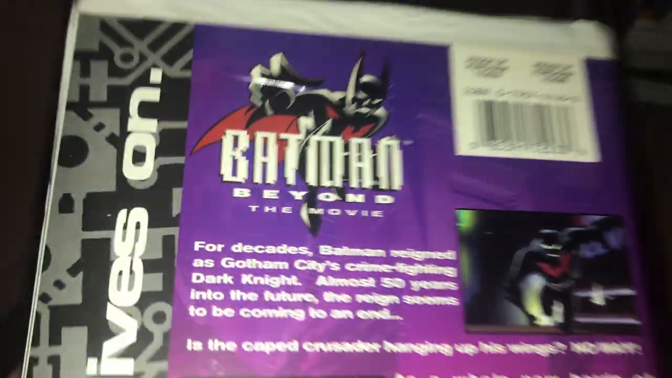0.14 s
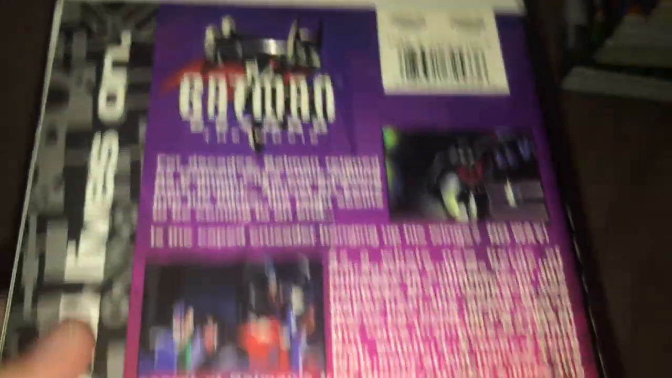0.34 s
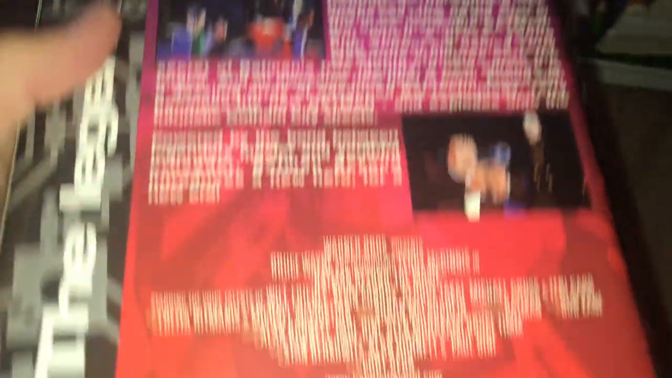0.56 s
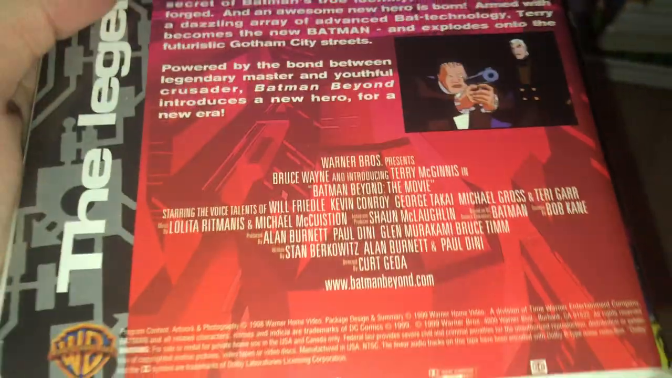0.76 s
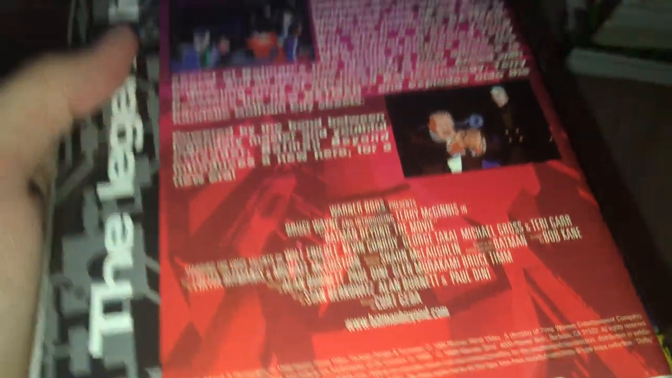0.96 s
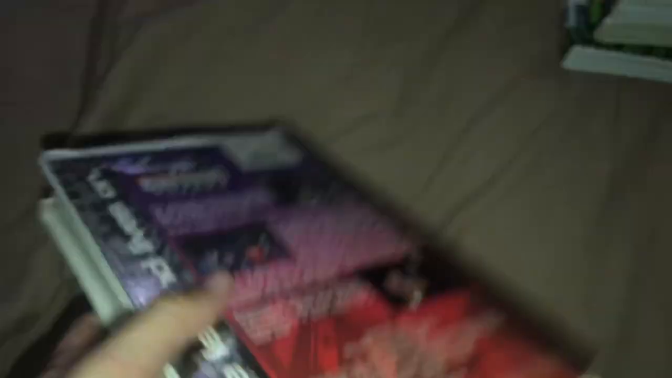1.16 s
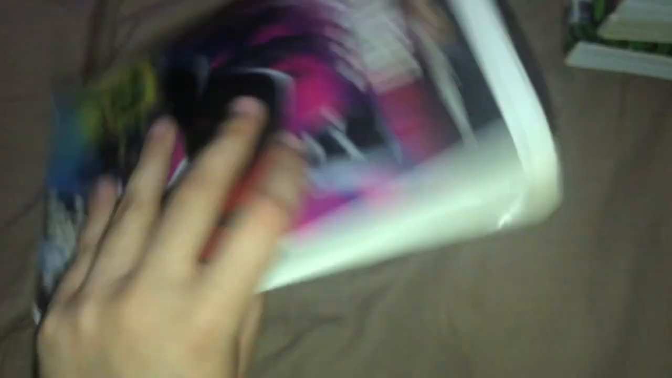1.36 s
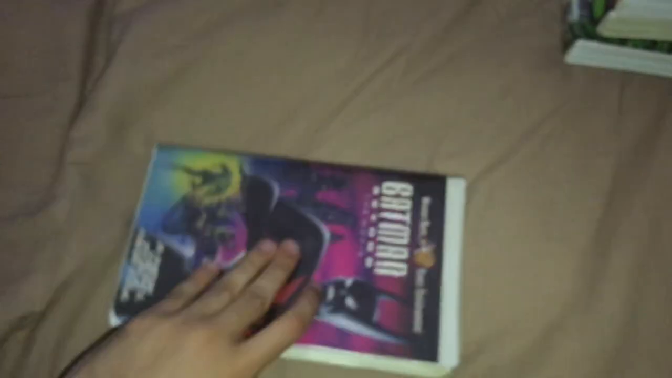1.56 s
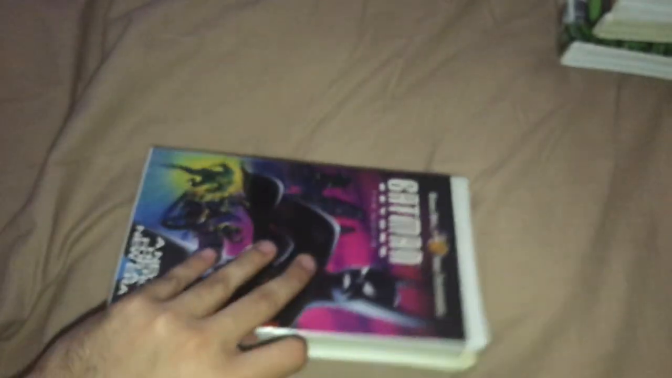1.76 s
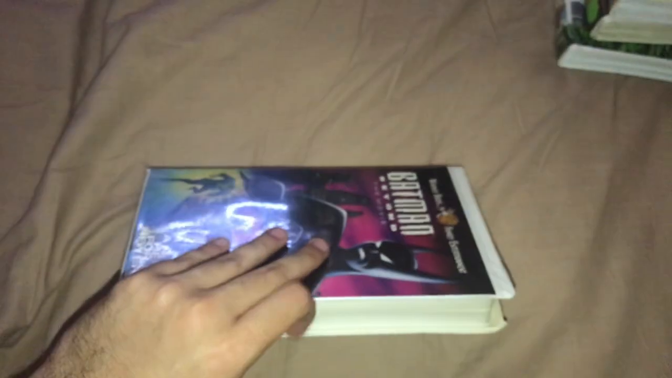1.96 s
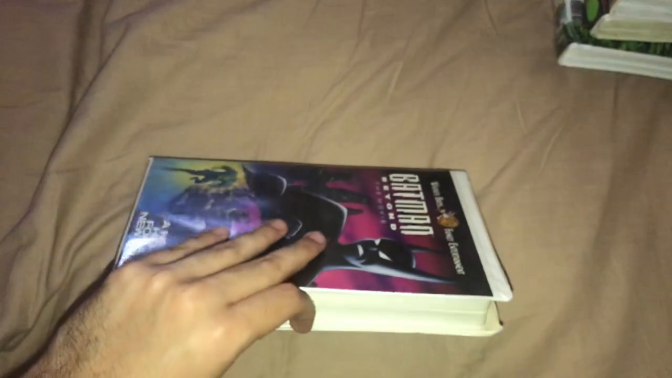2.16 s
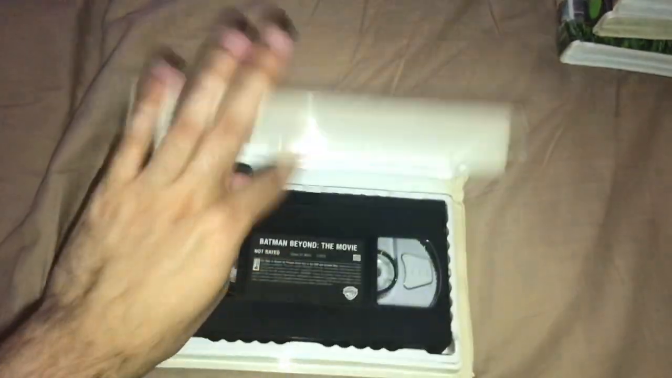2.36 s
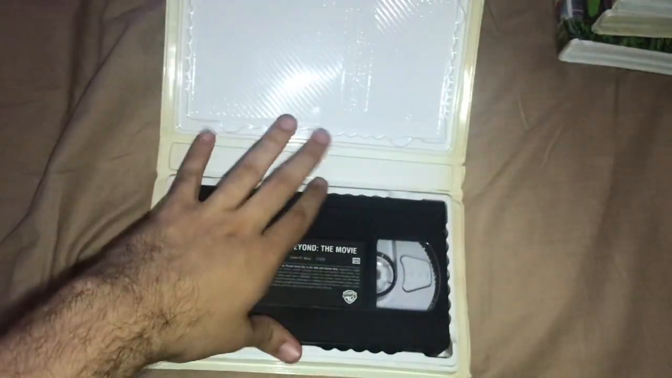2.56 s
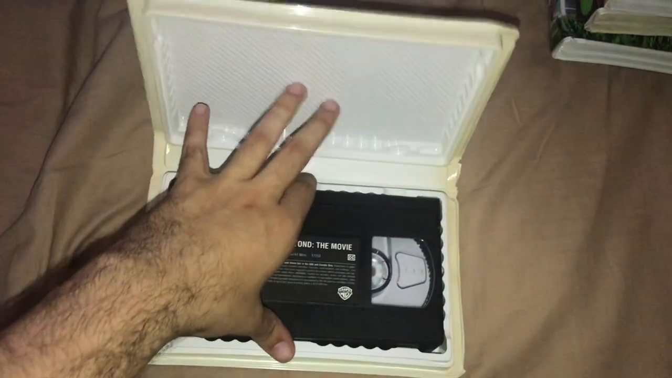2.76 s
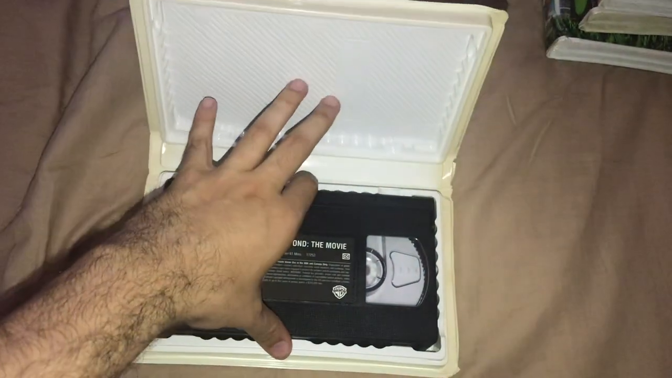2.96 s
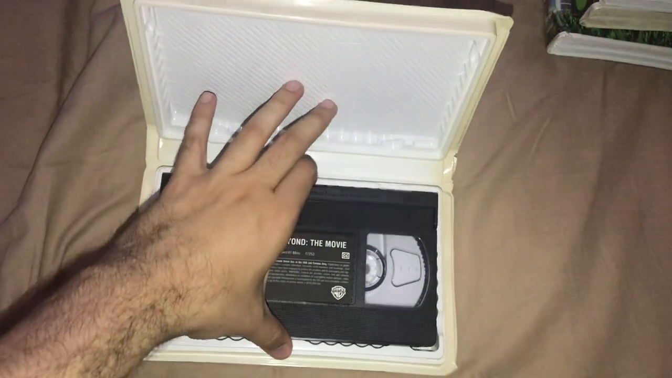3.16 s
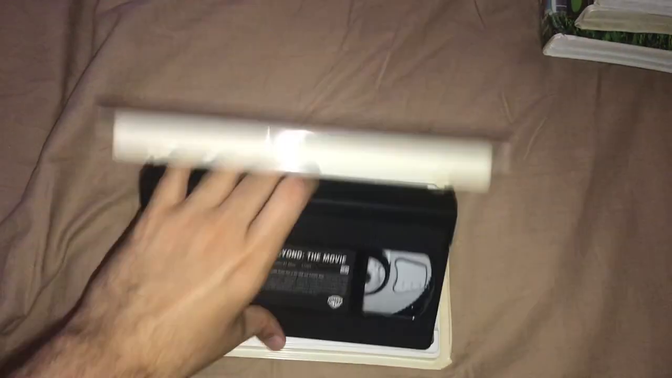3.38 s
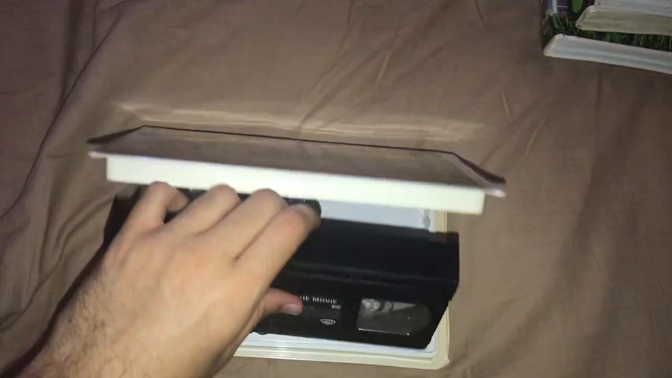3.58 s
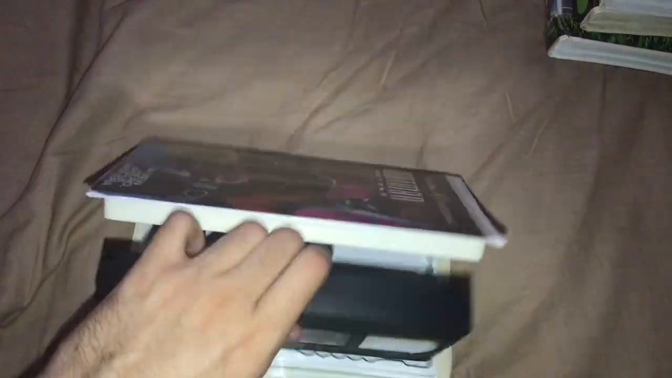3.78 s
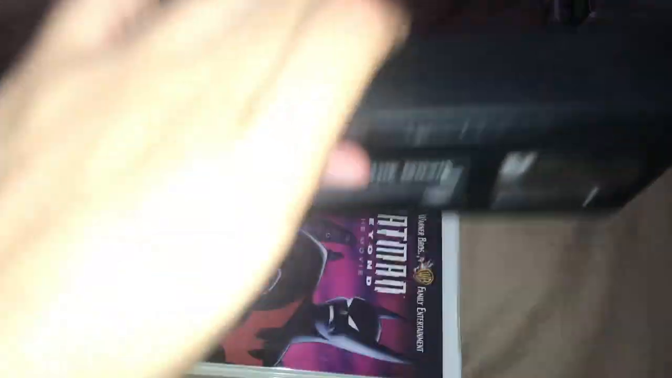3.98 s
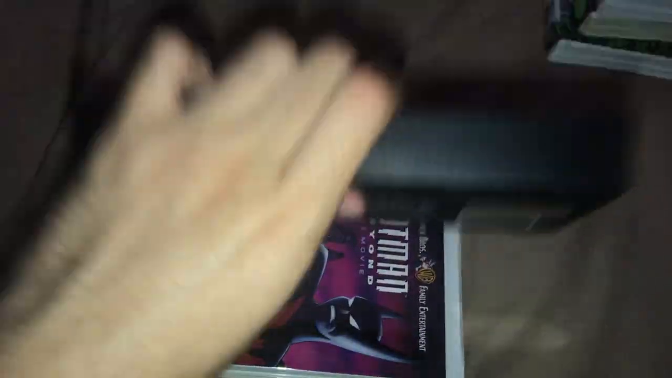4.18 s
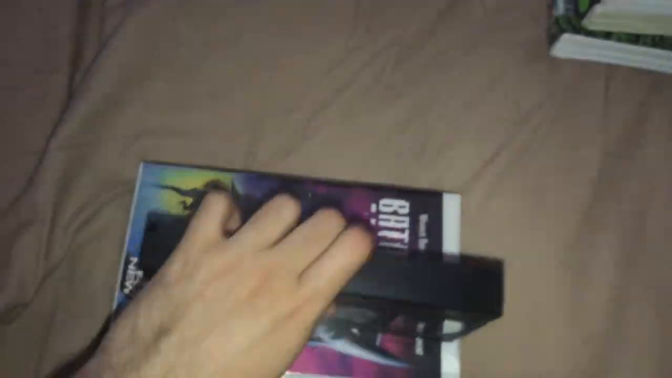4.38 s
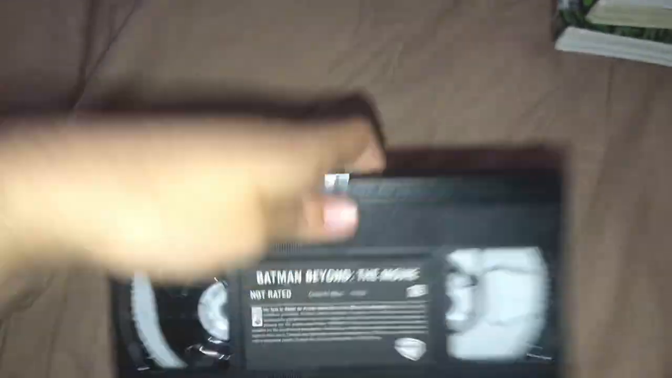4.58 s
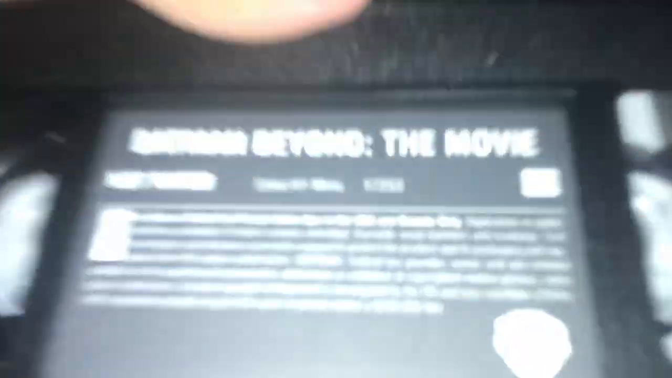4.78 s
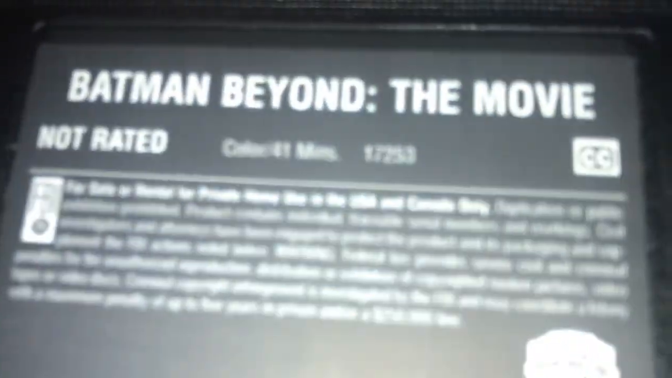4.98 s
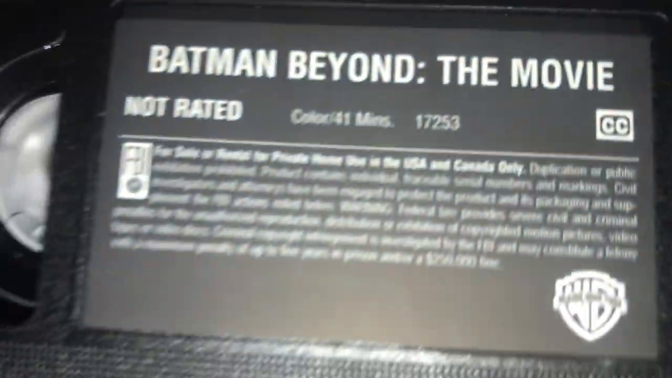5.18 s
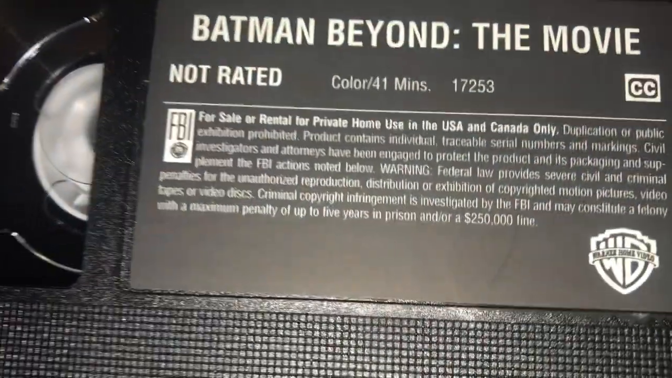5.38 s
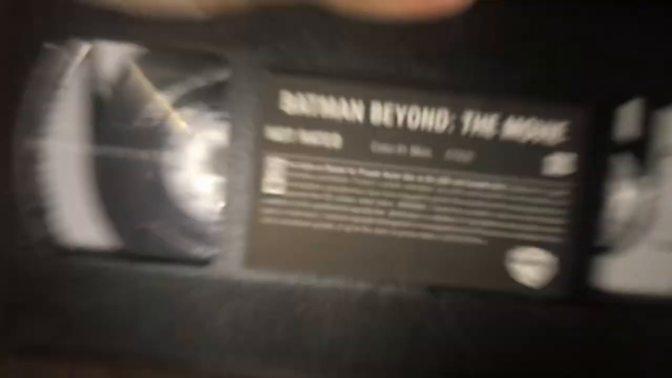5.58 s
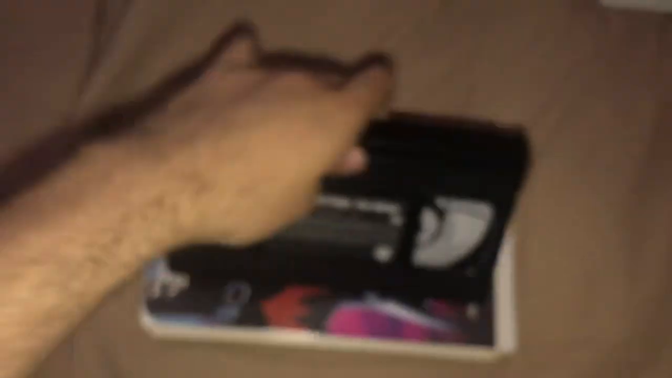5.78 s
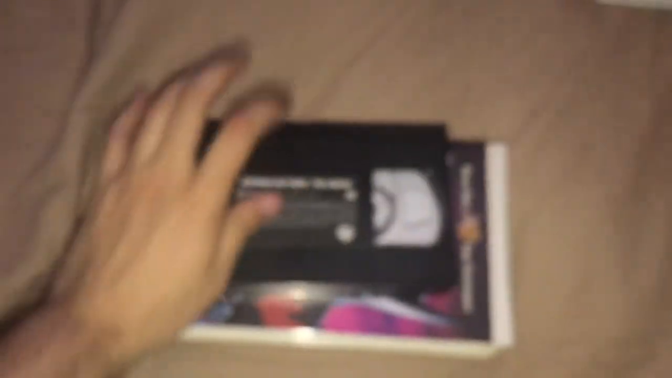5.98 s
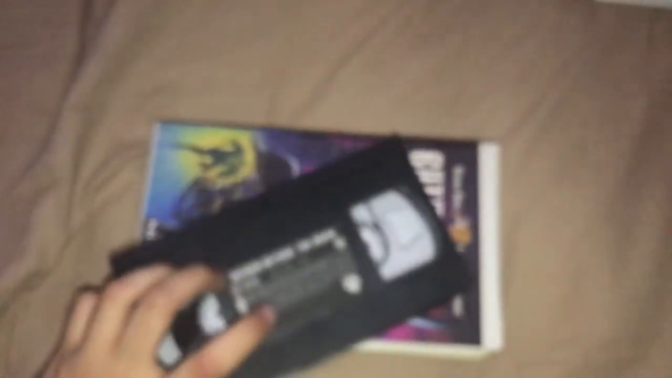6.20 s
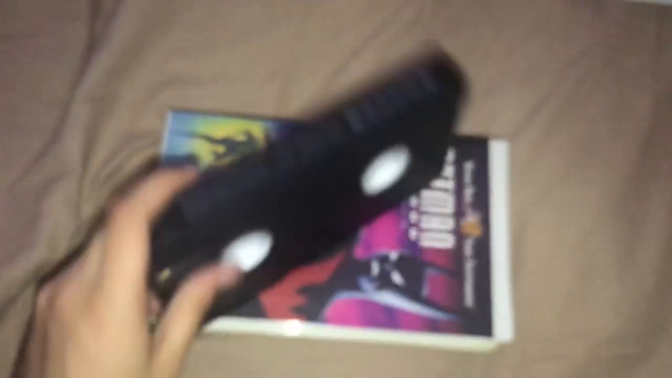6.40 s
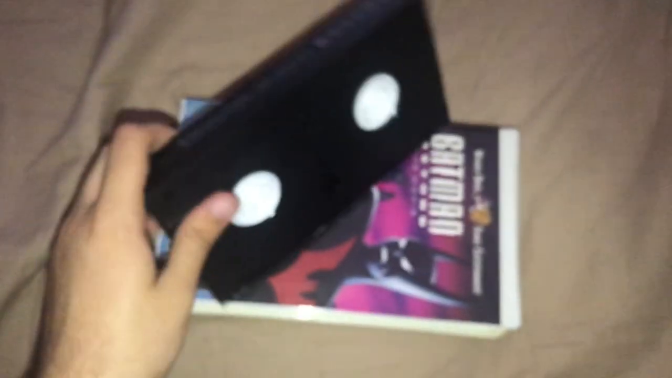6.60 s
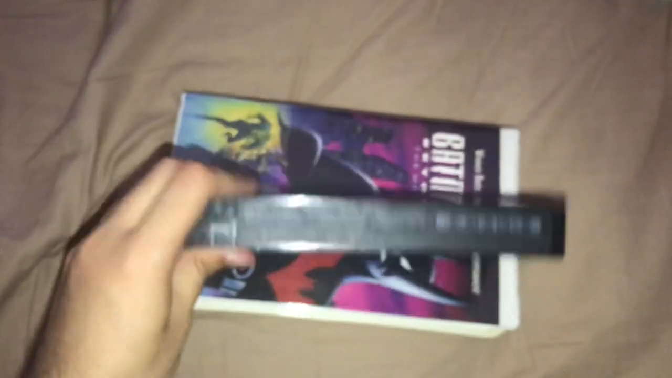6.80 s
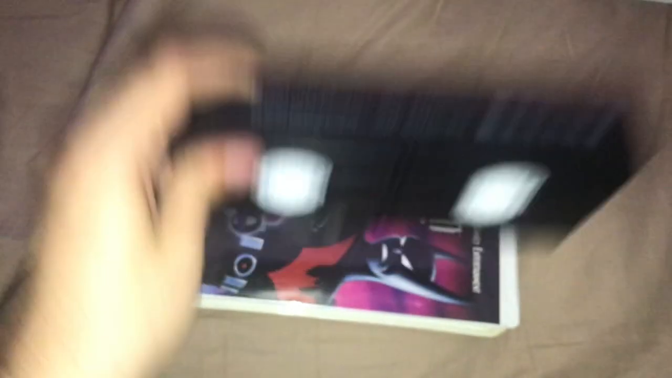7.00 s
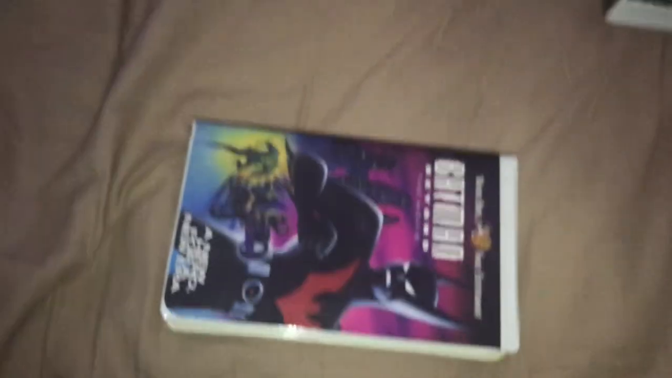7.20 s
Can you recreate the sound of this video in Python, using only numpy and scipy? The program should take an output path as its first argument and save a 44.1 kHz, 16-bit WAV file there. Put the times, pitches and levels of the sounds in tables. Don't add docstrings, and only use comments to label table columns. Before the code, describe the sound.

Close handling of a plastic tape case on a bed: soft touches, sharp clicks, hollow clacks, a heavy drop, then loose cassette rattle.

```python
import sys
import numpy as np
from scipy import signal
from scipy.fft import rfft, irfft
from scipy.io import wavfile
from scipy.ndimage import uniform_filter1d

SR = 44100
rng = np.random.default_rng(int(sys.argv[2]) if len(sys.argv) > 2 else 0)


def amplitude_ratio(level_db):
    exponent = np.asarray(level_db, float) / 20
    return 10 ** exponent


def digitize_waveform(pressure):
    field = np.atleast_2d(pressure).T
    bounded = np.clip(field, -1, 1)
    quanta = np.round(bounded * 32767).astype(np.int16)
    wavfile.write(sys.argv[1], SR, quanta)


N = 319725
RING = 2048

# pitch in Hz, level in dB, T60 in s.
BOX = [(356.6, 2.5, 0.04), (408, -6, 0.045), (492.6, -2, 0.039), (600, 1, 0.053), (713.5, -0.5, 0.049),
       (859, -11, 0.06)]
# frequency in Hz, level in dB.
CRACK = [(3000, -1), (4800, -2), (6000, -2), (8000, -7.5), (9300, -3), (10500, -11), (12500, -7.5),
         (15000, -13.5), (16900, -22)]
# start in s, pitch in Hz.
HOLLOW = [(0, 834), (0.03, 510), (1.55, 438), (2.2, 487), (3.1, 580), (3.75, 687), (4.2, 612), (4.95, 368),
          (5.6, 648), (5.88, 433), (6.3, 697)]


def unit(x):
    return x / np.sqrt(np.mean(x ** 2))


def colour(x, shape):
    hz, db = np.transpose(shape)
    f = np.log(np.maximum(np.arange(x.shape[-1] // 2 + 1) * SR / x.shape[-1], 1))
    outside = np.maximum(np.log(hz[0]) - f, 0) + np.maximum(f - np.log(hz[-1]), 0)
    gain = amplitude_ratio(np.interp(f, np.log(hz), db) - 40 * outside)
    return irfft(rfft(x) * gain, x.shape[-1])


def peak(hz, fall_db):
    return [(hz / 4, -2 * fall_db), (hz, 0), (hz * 4, -2 * fall_db)]


def ring(modes, spread_db, detune, damp):
    t = np.arange(RING) / SR
    hz, db, t60 = (c[:, None] for c in np.transpose(modes))
    decay = amplitude_ratio(-60 * t / (t60 * damp))
    return np.sum(amplitude_ratio(db + spread_db) * np.sin(2 * np.pi * hz * detune * t) * decay, axis=0)


def add(out, s, x, db):
    i = max(int(s * SR), 0)
    out[i:i + len(x)] += (x * amplitude_ratio(db) / np.abs(x).max())[:N - i]


def hum():
    # frequency in Hz, level in dB per Hz.
    hum_shape = [(12, -52.5), (20, -21.5), (56, 2), (86, -15), (123, -7), (168, -16.5), (241, -19.5),
                 (301, -22), (337, -23.5), (472, -35.5), (513, -35), (718, -37), (1260, -35), (3160, -43.5),
                 (16000, -48)]
    return unit(colour(rng.standard_normal(N), hum_shape)) * amplitude_ratio(-55)


def bedroom(x, treble_db=-1.0):
    # frequency in Hz, T60 in s.
    room_t60 = [(100, 0.026), (600, 0.21), (2500, 0.24), (12000, 0.24)]
    hz, t60 = np.transpose(room_t60)
    tail = 0
    for f in 80 * 1.425 ** np.arange(16):
        band = signal.butter(2, [f / 1.27, f * 1.27], "band", fs=SR, output="sos")
        direct, echoes = signal.sosfilt(band, [x, rng.standard_normal(N)])
        keep = amplitude_ratio(-120 / SR / np.interp(np.log(f), np.log(hz), t60))
        power = uniform_filter1d(direct ** 2, size=400, origin=199)
        energy = signal.lfilter([1 - keep], [1, -keep], power)
        tail = tail + unit(echoes) * np.sqrt(np.maximum(energy, 0)) * amplitude_ratio(treble_db * np.log2(f / 600))
    return tail * amplitude_ratio(-10.5)


def puffs():
    # middle in s, level in dB, half length in s, pitch in Hz, fall in dB per octave.
    swishes = [(0.12, -69.5, .04, 7400, 30), (0.47, -72, 0.074, 7400, 30), (2.052, -54, 0.013, 7000, 42),
               (2.048, -56, 0.01, 3900, 43), (3.315, -52, .03, 2200, 70), (3.37, -58, 0.017, 2900, 60),
               (4.1, -57, .015, 2000, 50), (4.82, -53, 0.016, 3500, 60), (4.81, -57, 0.025, 2000, 40),
               (6.8, -54, .015, 2360, 60), (6.26, -48, 0.064, 10600, 4), (6.26, -49.5, 0.075, 2800, 6),
               (6.732, -49, 0.017, 13000, 12), (6.97, -46, .02, 3300, 30), (3.885, -41, 0.01, 1900, 40),
               (1.628, -46, .01, 3700, 40), (2.378, -46, .008, 3000, 8), (2.159, -52, .004, 3000, 8),
               (2.637, -54, .004, 5000, 8), (3.221, -44, .004, 2000, 8), (4.885, -62, .02, 3500, 15),
               (6.725, -48, .025, 710, 90), (6.85, -40, .035, 710, 90), (2.283, -48, .01, 4000, 8),
               (4.075, -52, .012, 700, 40)]
    out, t = np.zeros(N + 16384), (np.arange(16384) - 8192) / SR
    for s, db, half, hz, fall_db in swishes:
        i = int(s * SR)
        hiss = unit(colour(rng.standard_normal(len(t)), peak(hz, fall_db)))
        out[i:i + len(t)] += hiss * amplitude_ratio(db) * np.exp(-(t / half) ** 2)
    return out[8192:8192 + N]


def rattle(slip, lift_db=8.0, width_oct=0.25, damp=0.32):
    start, loudest = np.transpose(HOLLOW)
    hollow_hz = loudest[np.maximum(np.searchsorted(start, np.arange(N) / SR) - 1, 0)]
    out = 0
    for hz, db, t60 in BOX:
        pole = amplitude_ratio(-60 / (t60 * damp * SR)) * np.exp(2j * np.pi * hz / SR)
        nearness = np.exp(-(np.log2(hz / hollow_hz) / width_oct) ** 2)
        lift = uniform_filter1d(lift_db * nearness, size=2000)
        out = out + unit(signal.lfilter([1, -1], [1, -pole], slip).imag) * amplitude_ratio(db + lift)
    return unit(out)


def rub(slips_per_s=1500, scatter_db=-1.0, smooth=0.84, flutter_db=2.0, knocks_per_s=220):
    # fastest moment in s, level in dB, bright part in dB, swell in s, fade in s (both over 20 dB).
    slide_events = [(1.75, -74.5, 2, 0.75, 0.52), (2.16, -88, 4, 0.28, 0.37), (2.36, -52, -1, 0.041, 0.12),
                    (2.5, -53, -21, 0.25, 0.042), (2.85, -74.5, -3, 0.17, 0.8),
                    (3.35, -48.5, -10, 0.13, 0.047), (3.6, -63, 2.5, .4, 0.52),
                    (3.9, -61.5, -31, 0.33, 0.35), (4.501, -56.5, 1, 0.074, 0.33),
                    (4.849, -66, -5, 0.39, 0.13), (5.699, -75.5, 1, 0.21, 0.9), (6.26, -52, 1, 0.14, 0.13),
                    (6.54, -43.5, -3, 0.19, 0.021), (6.78, -71, -21, 0.048, 0.17),
                    (6.9, -39.5, -6.5, 0.23, 0.085), (7.25, -60.5, 0.5, 0.51, 0.11)]
    # frequency in Hz, level in dB.
    slide_shape = [(900, -2.5), (1500, 8), (2400, 5.5), (3500, 0), (4800, -14)]
    s, db, bright_db, swell, fade = np.transpose(slide_events)[:, :, None]
    t, coarse = np.arange(N) / SR, np.arange(0, N + 32, 32) / SR
    age = coarse - s
    slides = amplitude_ratio(db - 20 * np.maximum(-age / swell, age / fade) ** 1.03)
    surface = np.interp(t, coarse, slides.sum(axis=0)) + amplitude_ratio(-82)
    bright = np.interp(t, coarse, (slides * amplitude_ratio(bright_db)).sum(axis=0)) + amplitude_ratio(-83)
    hollow = amplitude_ratio(-51.5) * (surface * amplitude_ratio(48.5)) ** 0.49 * amplitude_ratio(1.5 * (t > 6.32))
    grains = (rng.random(N) < slips_per_s / SR) * amplitude_ratio(scatter_db * rng.random(N))
    grains = grains * np.sign(rng.standard_normal(N))
    flutter = unit(uniform_filter1d(rng.standard_normal(N), size=700))
    slip = (unit(grains) + smooth * rng.standard_normal(N)) * amplitude_ratio(flutter_db * flutter)
    loose = (rng.random(N) < knocks_per_s / SR) * rng.standard_normal(N)
    return (unit(colour(slip, slide_shape)) * surface
            + unit(colour(slip, CRACK[1:])) * bright
            + rattle(unit(loose) + 1.21 * slip) * hollow)


def snaps(fade_ms=1.6, fall_db=12.5):
    # start in s, peak in dB, brightest pitch in Hz.
    snap_events = [(2.1745, -22, 13000), (2.345, -46, 12000), (2.375, -42, 6000), (3.22, -38, 3000),
                   (3.504, -25, 2200), (3.6666, -47, 8000), (4.0327, -56, 13000), (4.078, -31, 9000),
                   (4.1, -38, 11000), (4.113, -48, 11000), (4.2797, -47, 4000), (4.3475, -47, 3500),
                   (4.367, -47, 8000), (5.732, -50, 6000), (5.795, -52, 2500), (6.366, -49, 3000),
                   (6.455, -34, 10100), (6.5065, -16, 13000), (6.513, -15, 11900), (6.526, -38, 12000),
                   (6.758, -29, 9000), (6.79, -42, 13000), (6.809, -38, 5000), (6.872, -40, 12000),
                   (6.885, -38, 12000), (6.9, -27, 4000), (0.679, -58, 1600), (4.8115, -42, 3700),
                   (1.616, -36, 5500), (1.651, -40, 6000), (2.4528, -24, 11000), (2.407, -48, 14000),
                   (2.662, -42, 13000), (4.101, -38, 2200), (4.39, -12, 4200), (4.403, -22, 2400),
                   (4.779, -46, 2200), (4.968, -52, 1600), (5.05, -56, 3500), (5.227, -50, 3500),
                   (5.28, -54, 4500), (5.19, -58, 1500), (1.34, -52, 3900), (6.907, -16, 4200),
                   (2.312, -30, 2500), (5.918, -32, 3000)]
    out, ms = np.zeros(N), np.arange(512) * 1000 / SR
    for s, db, hz in snap_events:
        spark = colour(rng.standard_normal(len(ms)), peak(hz, fall_db))
        add(out, s, spark * (1 - np.exp(-ms / .3)) * np.exp(-ms / fade_ms), db)
    return out


def thuds(cycles=1.4):
    # start in s, peak in dB, pitch in Hz.
    thud_events = [(1.612, -31.5, 255), (1.624, -34.5, 67.3), (1.643, -24, 150), (1.353, -40, 300),
                   (4.087, -35, 330), (4.39, -24, 190), (1.895, -36.5, 253), (2.291, -35, 212),
                   (2.381, -32, 123), (2.46, -32.5, 108), (2.864, -38, 122), (3.497, -34.5, 250),
                   (3.702, -36, 130), (4.083, -41, 110.6), (4.385, -26.5, 134), (4.391, -18, 257),
                   (4.405, -25, 201), (4.437, -33.5, 132), (5.871, -29, 210), (5.892, -28.5, 110),
                   (5.982, -24, 202), (6.008, -30, 181), (6.149, -42.5, 266), (6.502, -42.5, 80),
                   (6.74, -34, 59), (6.751, -32, 250), (6.901, -34.5, 100)]
    out, t = np.zeros(N), np.arange(RING) / SR
    for s, db, hz in thud_events:
        add(out, s, np.sin(2 * np.pi * hz * t) * t * hz * np.exp(-t * hz * np.pi / cycles), db)
    return out


def reels(t60=0.074, push_ms=2.2):
    # start in s, peak in dB, pitch in Hz.
    reel_events = [(2.177, -40, 482), (2.391, -27, 565), (3.504, -30, 603), (4.1, -38, 565),
                   (4.419, -23, 565), (4.451, -30, 614), (5.712, -40, 622), (5.872, -15, 616),
                   (6.15, -46, 501), (6.18, -47, 482), (6.351, -46, 571), (6.366, -42, 511),
                   (6.414, -42, 700), (6.439, -38, 626), (6.464, -29, 698), (6.514, -29, 729),
                   (6.544, -31, 692), (6.605, -49, 716), (6.705, -45, 716), (6.821, -24, 703),
                   (6.904, -20, 714), (6.994, -41, 590), (7.01, -39, 713), (7.098, -45, 610),
                   (7.146, -49, 619), (7.206, -51, 790)]
    out, t = np.zeros(N), np.arange(2 * RING) / SR
    for s, db, hz in reel_events:
        tone = np.sin(2 * np.pi * hz * t) + 0.39 * np.sin(2 * np.pi * 1.09 * hz * t)
        add(out, s, tone * (1 - np.exp(-t * 1000 / push_ms)) * amplitude_ratio(-60 * t / t60), db - 3.5)
    return out


def contacts(table, rise, rebounds, first, focus_db=15.5, focus_oct=0.087, spot_db=5.0, crack_ms=0.35,
             box_db=4, crack_db=4):
    # pitch in Hz, level in dB, T60 in s.
    panel_modes = [(1200, 16, 0.024), (1430, 7.5, 0.02), (1640, 4, 0.022), (1870, 1, 0.018),
                   (2250, 7, 0.028), (2500, -2, 0.016), (2900, -11.5, 0.0075), (3353, -3, 0.032),
                   (3760, -2, 0.017), (4235, -9.5, 0.013), (5500, -8.5, 0.0097), (5370, -1, .008)]
    out, t = np.zeros(N), np.arange(RING) / SR
    panel_hz, box_hz = np.array(panel_modes)[:, :1], np.array(BOX)[:, :1]
    for s, db, hollow_db, bright_db, hz, ms in table:
        spot, noise = rng.standard_normal((2, 18, 1)), rng.standard_normal((2, RING))
        ms = max(ms, .3) * np.clip(1.5 + (db + 23.5) / 40, .35, 1.3)
        age = t * 1000 / ms
        force = (1 - np.exp(-age / rise)) ** 3 * np.exp(-age)
        chatter = (rng.random(RING) < rebounds / SR) * noise[0] * force
        chatter[int(rise * ms * SR / 1000)] += first

        octaves = np.log2(panel_hz / hz)
        focus = focus_db * np.exp(-(octaves / focus_oct) ** 2)
        focus = focus - 2.1 * np.maximum(octaves, 0) - 1.8 * np.maximum(-octaves, 0)
        panels = ring(panel_modes, focus + spot_db * spot[0, :12], 1 + 0.023 * spot[1, :12],
                      0.32 * amplitude_ratio(0.33 * np.maximum(focus, 0)))
        hollow_hz = [f for start, f in HOLLOW if start <= s + .01][-1]
        lift = 10.5 * np.exp(-(np.log2(box_hz / hollow_hz) / 0.27) ** 2)
        box = ring(BOX, lift + 0.5 * spot_db * spot[0, 12:], 1 + 0.012 * spot[1, 12:], 0.85)
        panels = np.diff(panels * (1 - np.exp(-t * 1000 / 0.18)), prepend=0)
        box = np.diff(box, prepend=0)

        bursts = signal.fftconvolve(np.abs(chatter) * np.exp(-.7 * age), np.exp(-t * 1000 / crack_ms))[:RING]
        crack = colour(np.roll(noise[1] * bursts, 32), CRACK)
        add(out, s, signal.fftconvolve(panels, chatter), db)
        add(out, s, signal.fftconvolve(box, chatter * np.exp(-age)), db + min(hollow_db, 8) + box_db)
        add(out, s - 32 / SR, crack, db + bright_db + crack_db)
    return out


def knocks():
    # start in s, panel peak in dB,
    # hollow box in dB, crack in dB, loudest panel pitch in Hz.
    case_hits = [(1.642, -32, 6.5, -30, 1430), (1.65, -36, -18, -6, 1500), (1.706, -30.5, 2, -11, 3700),
                 (1.7425, -38, -30, -31, 1430), (1.8913, -30.5, -3.5, 1, 1260),
                 (2.162, -26, -9.5, -4, 1400), (2.1754, -37.5, 8, 6.5, 1260), (2.2902, -31.5, 1, -23, 2620),
                 (2.3049, -22.5, -2.5, -10, 2430), (2.3844, -17, -3, -6.5, 1290),
                 (2.3904, -26, -2.5, -4, 2260), (2.4521, -24, -2.5, 1.5, 5100),
                 (2.64, -25, -9.5, -15, 2900), (3.2233, -20.5, 0.5, -9, 1430),
                 (3.3425, -25.5, -8, 6.5, 2320), (3.471, -27, -13, -19, 2000), (3.485, -31, -37, -17, 1670),
                 (3.495, -20.5, -5, -3.5, 2070), (3.703, -18, -10, -11, 1640),
                 (3.7634, -29.5, -8, -5, 1990), (3.8226, -13.5, -8.5, -6, 1670),
                 (3.8885, -39.5, 8, 3, 2300), (4.0538, -34, -39, -8, 1550),
                 (4.0853, -27.5, 1.5, -1.5, 1630)]
    # start in s, panel peak in dB, # hollow box in dB, crack in dB, loudest panel pitch in Hz.
    cassette_hits = [(4.38, -12, 5, -30, 2710), (4.3887, -9, 4, 4.5, 1640), (4.448, -21, -4.5, -14, 1030),
                     (5.8692, -24, 8, -29, 1720), (5.8905, -13, 2.5, -15, 2900),
                     (5.8946, -22, 8, -26, 1530), (5.9812, -12.5, -1.5, 5, 2360),
                     (5.9867, -12.5, -2.5, -4.5, 3800), (6.4627, -16, -9, -0.5, 3210),
                     (6.5065, -17.5, -14, -13, 3540), (6.5127, -16, -7.5, -22, 2470),
                     (6.5394, -21.5, -1, -1, 1710), (6.7492, -13.5, -4, -6, 3270),
                     (6.7633, -29, -6, -22, 1640), (6.7755, -19.5, -5.5, -32, 1830),
                     (6.8157, -18.5, -16, 2, 3760), (6.8302, -28.5, 2, 4, 2390),
                     (6.8588, -23.5, -12, -27, 1700), (5.7101, -37, -0.5, -4.5, 2300),
                     (6.8972, -19, -5, 10, 4570), (6.9035, -9.5, -8.5, -2, 3700),
                     (7.0083, -39, 1.5, -21, 1870), (7.1081, -42.5, 2.5, -11, 1310),
                     (0.0024, -49.5, 8, 2.5, 1090)]
    # start in s, panel peak in dB, hollow box in dB, loudest panel pitch in Hz.
    touches = [(0.0568, -61, 8, 2100), (0.425, -46, -12, 1510), (0.4485, -44, -8, 1490),
               (0.6163, -50, -34, 1640), (0.68, -43, -5, 1460), (0.7575, -49.5, -6, 1540),
               (1.073, -58.5, 7, 1640), (1.2895, -40, -20, 1900), (1.3168, -48.5, 1, 2300),
               (1.3559, -50.5, 8, 1200), (1.4447, -47, -14, 2500), (1.46, -45, -27, 1960),
               (1.6131, -40.5, 8, 3320), (1.7576, -42.5, -12, 1210), (2.464, -40, 8, 2260),
               (2.8665, -41, -5, 2630), (3.3706, -49, -19, 2620), (4.166, -43.5, -16, 1870),
               (4.2953, -58, 4, 1750), (4.649, -43, -17, 2380), (4.78, -41, -22, 2250),
               (4.811, -36, -18, 1520), (5.0135, -34, -6.5, 1880), (5.132, -51, 8.5, 2080),
               (5.233, -39.5, -1.5, 1850), (5.2597, -51, 6, 1650), (5.2922, -44.5, 2.5, 1640),
               (6.147, -48, 13, 2370), (6.1824, -57, 9, 2150), (6.3544, -79, 15, 1450)]
    # start in s, panel peak in dB, crack in dB, loudest panel pitch in Hz.
    ticks = [(1.184, -63, 11.5, 1090), (1.2245, -50, -2, 2300), (1.2517, -43, -1, 1870),
             (1.5908, -45, -6, 1240), (1.847, -35, 1.5, 1340), (2.077, -52, 2, 2900),
             (2.5187, -52, -13, 2240), (2.5539, -36, -12, 1990), (2.662, -36.5, -4, 3240),
             (2.8548, -35.5, -0.5, 1720), (3.087, -51.5, -1, 1600), (3.4517, -40, -3, 2820),
             (3.7294, -49.5, 11, 1550), (3.8018, -25.5, -4, 2550), (3.8092, -28.5, 3, 1880),
             (4.5307, -55, 3, 2200), (4.6735, -44.5, 8, 2260), (5.4964, -53.5, 2, 2220),
             (5.6486, -50, -7, 2030), (5.689, -60, 11.5, 2300), (6.881, -35, -11.5, 1760),
             (5.7705, -47.5, -12, 1310), (5.8257, -44, -1, 1530), (6.3894, -59, -13, 1210),
             (6.4268, -32.5, -2.5, 2460), (6.9194, -27.5, 4, 3960), (7.0394, -58, 10, 2870),
             (7.0774, -40, 18, 3600), (7.2307, -38, -9, 2890)]
    # start in s, panel peak in dB, crack in dB, loudest panel pitch in Hz, length in ms.
    scuff_events = [(0.0887, -59, -2, 2160, 33), (0.2897, -61, -12, 1470, 12),
                    (0.4094, -58, -16, 2940, 6.6), (0.4525, -60, -30, 1540, 32),
                    (1.334, -48, -24, 1860, 8.2), (1.4448, -56, -23, 1790, 31), (1.6042, -32, -8, 1330, 22),
                    (2.0323, -43, -11, 1440, 11), (2.2758, -30.5, -1, 2380, 16.6),
                    (3.3246, -26, -11, 2680, 12), (3.8638, -23.5, -9, 1680, 10),
                    (4.267, -43, -39, 1830, 13), (4.342, -42.5, -10, 2380, 29),
                    (4.7983, -38, -10.5, 1900, 16), (6.4951, -18, -23, 3910, 8.5),
                    (6.7123, -42.5, 6, 2800, 26)]
    # s, panel dB, hollow dB, crack dB, pitch Hz, chatter ms
    hits = [(*row, 3.5) for row in case_hits]
    hits += [(*row, 3.7) for row in cassette_hits]
    hits += [(s, db, hollow, -20, hz, 3.1) for s, db, hollow, hz in touches]
    hits += [(s, db, -4.5, crack, hz, 3.1) for s, db, crack, hz in ticks]
    scuffs = [(s, db, -11, *rest) for s, db, *rest in scuff_events]
    return (contacts(sorted(hits), rise=.35, rebounds=3500, first=0.4)
            + contacts(scuffs, rise=0.36, rebounds=7600, first=.02))


def scene():
    hits = knocks() + thuds() + reels()
    return (hits + bedroom(hits) + rub() + hum() + puffs() + snaps())[None]


def roll_off(x):
    return signal.sosfilt(signal.butter(12, 16960, fs=SR, output="sos"), x)


def record(dry):
    # frequency in Hz, level in dB.
    mic_shape = [(15, 3.5), (300, 3.5), (640, -0.5), (850, -3.5), (1020, -7), (1160, -4), (1350, -2.5),
                 (4000, -1), (4900, -2.5), (6000, -4), (7800, -4), (15700, -1.5), (16000, -17),
                 (16800, -25), (17000, -50)]
    rounded = 0.77 * np.tanh(dry / 0.98)
    return roll_off(colour(rounded, mic_shape))


dry = scene()
out = record(dry)
digitize_waveform(out)
```